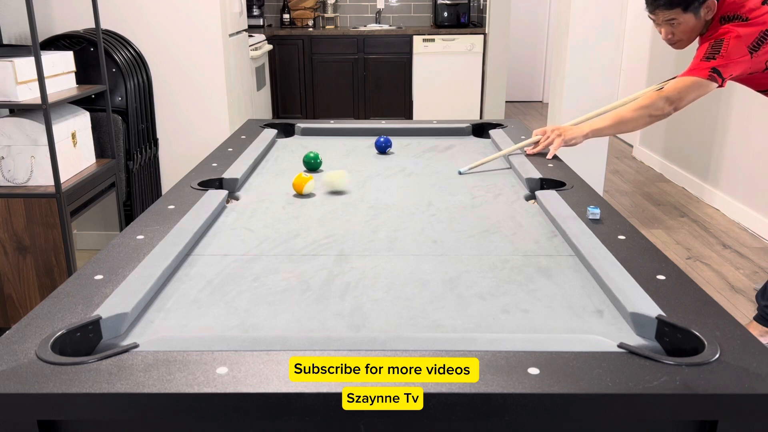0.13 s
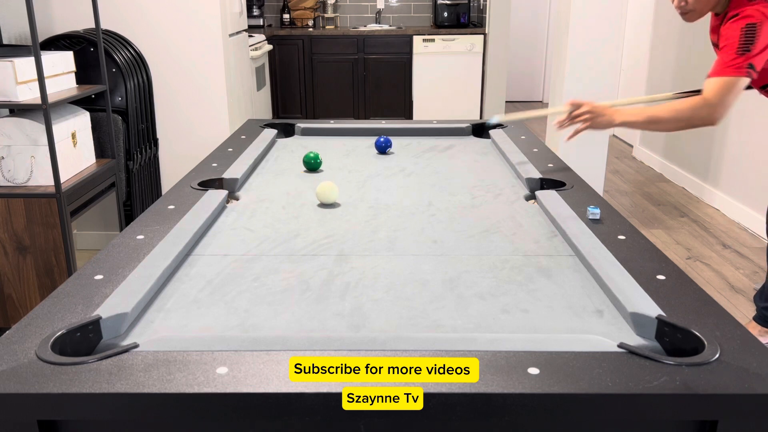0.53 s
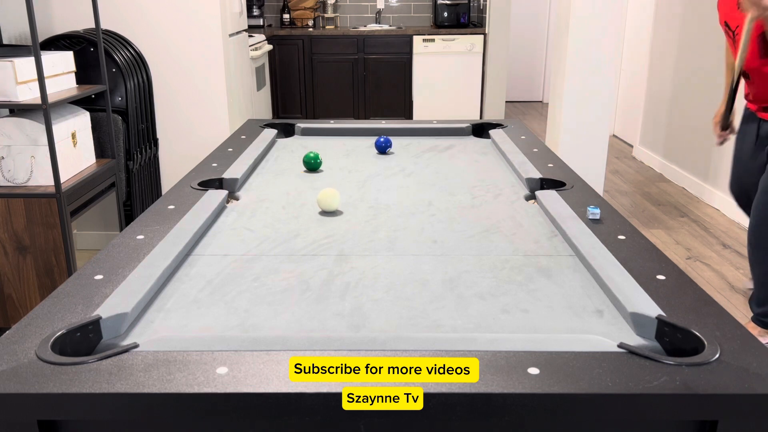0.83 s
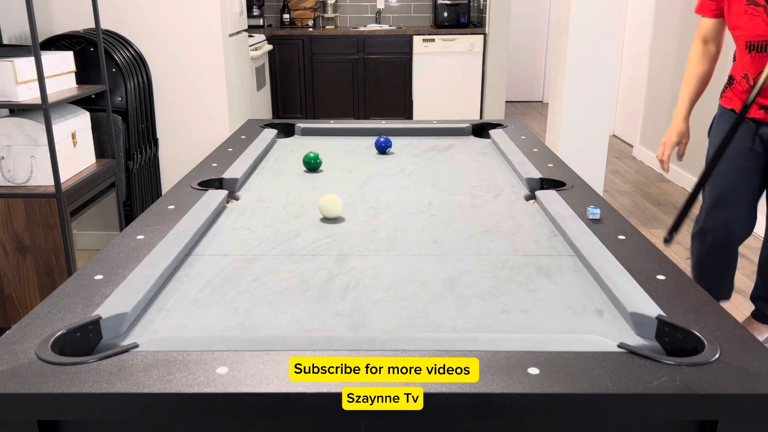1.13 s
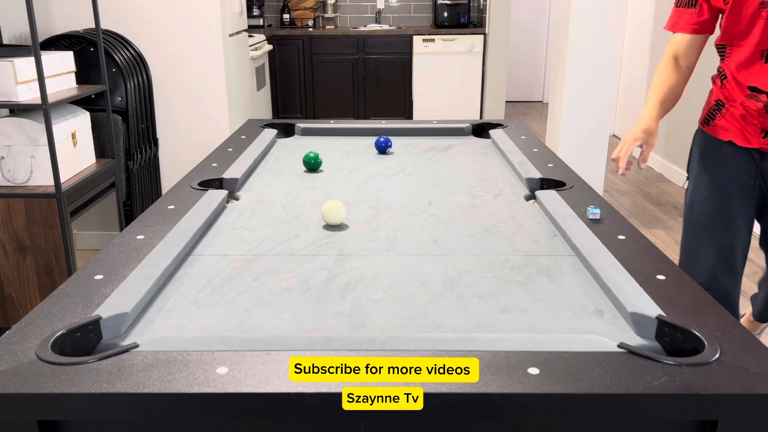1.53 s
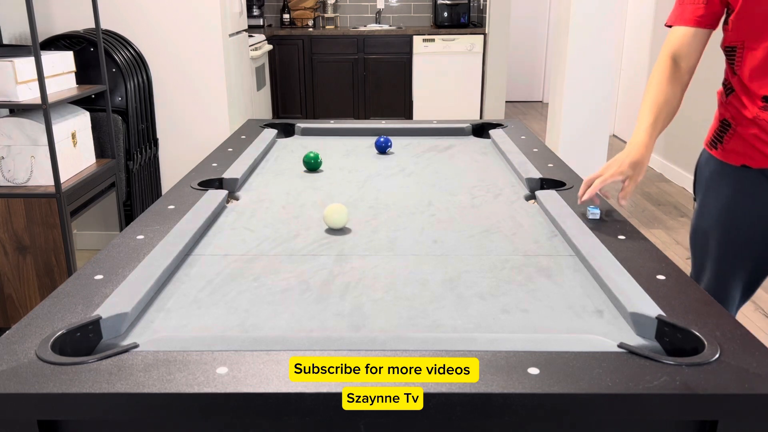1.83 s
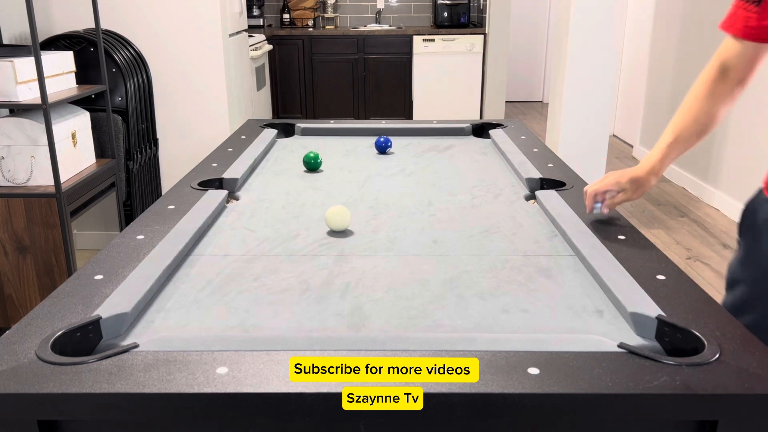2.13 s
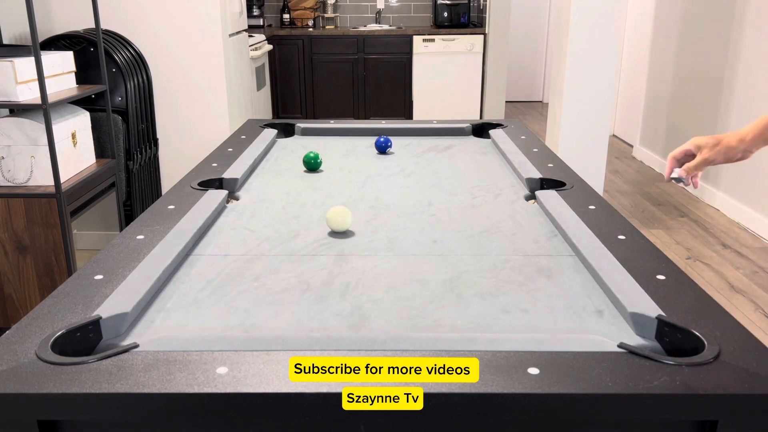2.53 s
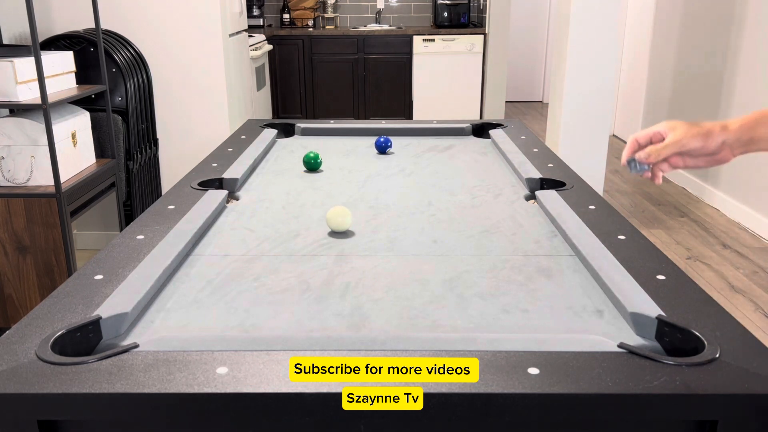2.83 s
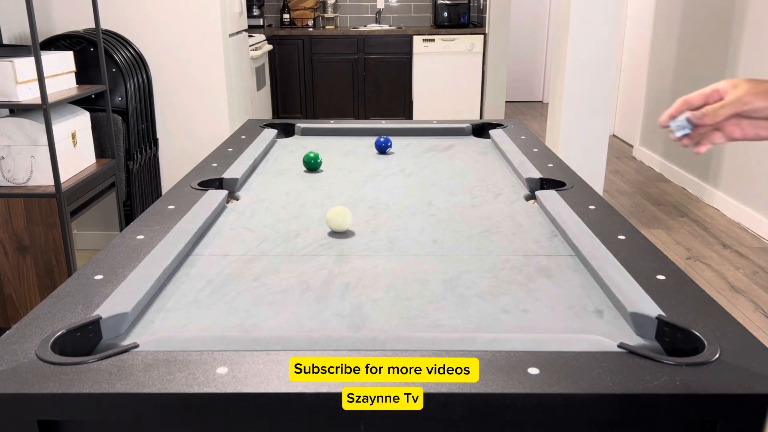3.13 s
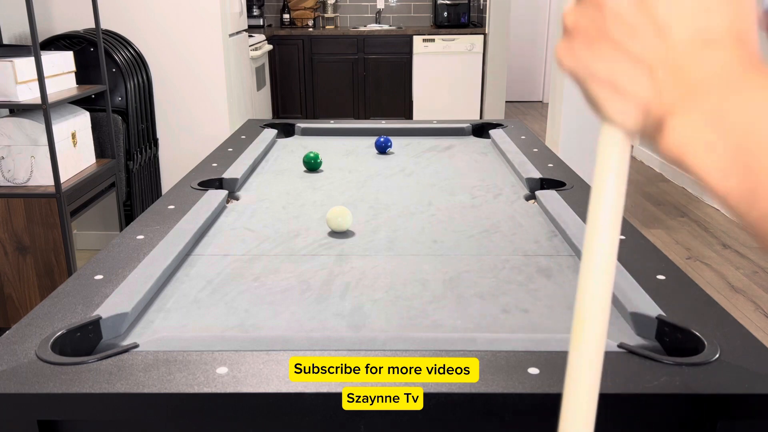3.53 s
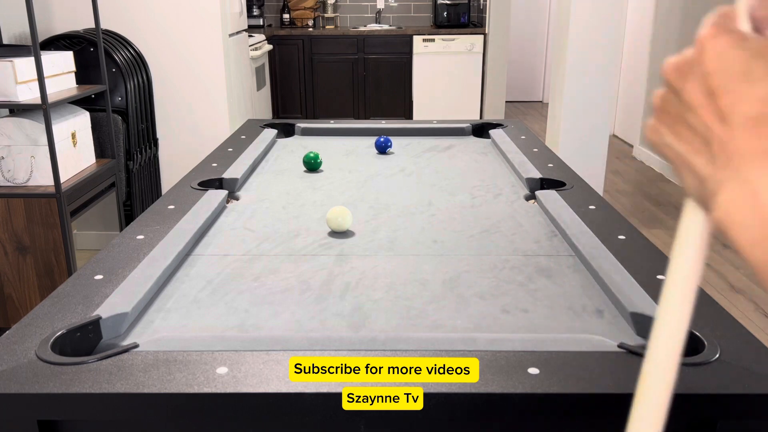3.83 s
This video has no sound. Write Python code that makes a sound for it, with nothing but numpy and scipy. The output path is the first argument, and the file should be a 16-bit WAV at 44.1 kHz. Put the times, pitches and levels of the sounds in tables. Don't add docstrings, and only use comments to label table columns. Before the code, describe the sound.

In a hard-floored, reverberant home room, a pool ball is struck, clicks another and drops into a pocket with a rattling thud; soft cloth movement, chalk ticks and a low cue-butt thump near the phone microphone follow.

```python
import sys
import numpy as np
from scipy import signal
from scipy.fft import rfft, irfft
from scipy.io import wavfile
from scipy.ndimage import uniform_filter1d

SR = 44100
rng = np.random.default_rng(int(sys.argv[2]) if len(sys.argv) > 2 else 0)


def linear_from_db(decibels):
    return 10 ** (np.asarray(decibels, float) / 20)


def transcribe(signal):
    frames = np.atleast_2d(signal).T
    limited = np.clip(frames, -1, 1)
    pcm = np.round(limited * 32767).astype(np.int16)
    wavfile.write(sys.argv[1], SR, pcm)


N = 176400
T = np.arange(N) / SR

# pitch_hz, level_db (per Hz)
RUMBLE = [(12, -39.5), (20, -10.5), (65, -4.5), (124, -13.5), (171, -14), (193, -17), (800, -30.5),
          (1040, -66), (1760, -120)]
RUMBLE_DB, SWELL_DB = -59.5, .4
# pitch_hz, level_db (per Hz)
AIR = [(700, -7), (900, -2), (1600, 2.5), (2600, -1), (3300, -16.5), (8000, -21.5), (12500, -9.5),
       (16000, -20.5)]
AIR_DB = -73
# pitch_hz, width_hz, level_db (rms)
FRIDGE = [(70.6, 19, -68.5), (166, 8, -74.5), (294.5, 7, -74.5)]

# time_s, level_db
ROLL = [
    (0, -43.5),
    (.2, -47.5),
    (.4, -56.5),
    (.65, -47.5),
    (1.1, -66),
]
# pitch_hz, width_hz, level_db
SLATE = [(74.5, 8.7, 4), (151, 25, -5), (300, 26, -3.5)]
ROLL_HISS_DB, ROLL_HISS_HZ = -16.5, 5000

# time_s, effort_db, crispness_db
MOVE = [(1.419, -84.5, 2), (1.469, -74, -7.5), (1.6, -71.5, -7.5), (1.75, -100, -11.5), (1.93, -100, 1),
        (2.0, -74.5, -2.5), (2.12, -71, -4.5), (2.27, -80, -1.5), (2.46, -100, -2), (2.549, -71, -4.5),
        (2.62, -64, -6.5), (2.68, -71.5, 1), (2.76, -66.5, 3), (2.9, -77.5, 0), (3.19, -88.5, 11),
        (3.219, -71.5, 0.5), (3.31, -81.5, 0), (3.42, -70, -1.5), (3.57, -68, -7), (3.66, -77.5, -4),
        (3.8, -82, -4.5), (3.881, -75, -3)]
# pitch_hz, level_db (per Hz)
FABRIC = [(400, -13.5), (900, -6), (1400, -4), (3000, -2.5), (6000, -6.5), (9000, -12), (12500, -6),
          (16000, -12)]
FABRIC_DB, FABRIC_GRAIN_DB = 6, 1
BACKGROUND_PAN_DB = 2.5

# start_s,
# level_db (rms), centre_hz, t60_s, pan_db (left over right)
SCUFFS = [(.001, -44.5, 12480, 0.2, 0.5), (.1832, -37, 13700, 0.014, 0), (.1885, -49, 12750, 0.19, 0.5),
          (.326, -39, 596, 0.67, 1.5), (.42, -29.5, 300, 0.72, -3), (.42, -56.5, 4570, 0.93, 10),
          (.8, -57.5, 500, 1.9, 2), (1.878, -66, 867, .25, 3), (1.488, -63, 1618, .5, 3),
          (1.965, -63, 800, .5, 3), (1.988, -57, 1098, .6, 2), (2.035, -60.5, 1350, .6, 1),
          (.19, -38, 150, .3, 1), (3.73, -52.5, 130.5, .5, 1), (3.208, -61, 1010, 0.15, -5),
          (3.328, -53, 1220, 0.075, -2), (3.33, -58.5, 400, 0.34, 6), (0.1879, -53.5, 6904, 0.17, 7),
          (0.325, -52.5, 12950, .4, 1), (.327, -54.5, 6190, 0.58, 8), (.466, -58, 13020, 0.34, 1.5),
          (.466, -59, 6600, 0.31, 3.5), (0.569, -61, 13070, 0.39, -0.5), (.568, -59.5, 6500, 0.15, 12),
          (0.678, -60.5, 8950, .1, 6.5), (.682, -49, 12980, 0.22, 0), (.682, -54.5, 6480, 0.76, 8),
          (0.682, -39, 3335, 0.055, 7), (.72, -59.5, 12440, 1, 0.5), (1.336, -77, 3360, 0.16, 10.5),
          (1.442, -70.5, 6980, 0.1, 2.5), (3.2, -62, 6930, 0.043, 2), (3.199, -59.5, 13000, .05, 0.5),
          (3.221, -66, 6930, 0.058, 2), (3.221, -62, 13150, 0.054, -11), (3.716, -62.5, 12970, 0.13, 1),
          (3.862, -64, 3040, 0.2, 4), (3.866, -62.5, 7460, 0.11, 3), (3.866, -64, 13030, 0.093, 1.5),
          (3.967, -59.5, 8280, 0.11, -2), (3.97, -64.5, 12950, .3, 0.5)]
SCUFF_WIDTH, SCUFF_RISE_S, SCUFF_TOP_HZ = 0.39, .001, 14500
SCUFF_ALIKE = 0.35

# time_s, level_db, pitch_hz, length_cycles, pan_db (left over right)
TICKS = [(1.445, -71, 5000, 0.33, 11), (1.89, -50.5, 300, 0.97, 3.5), (2.006, -49.5, 754, 1.5, 2),
         (2.018, -54.5, 1100, 1.6, -5), (2.046, -53, 780, 1.2, 1), (3.2088, -46, 1400, 0.35, 6),
         (3.2105, -48, 696, 0.65, -0.5), (3.329, -51, 1980, 0.38, 5), (3.3315, -53, 900, 0.53, 2),
         (3.3355, -62, 1290, 1.2, -4), (3.34, -45, 354, 0.32, -2)]
NEAR = [(3.058, -59, 8970, 0.38, 0.5), (3.2, -56, 5950, .25, 1), (3.222, -58, 7000, 0.68, 3),
        (3.713, -46, 2025, 0.74, 1.5), (3.715, -50, 13460, 2.1, 2), (3.752, -36, 75, 0.86, 1),
        (3.735, -46.5, 149.2, .8, 0.9), (3.79, -45, 120, 1, 0.3), (3.84, -59, 12500, 1, 3),
        (3.556, -60, 13000, 1.5, 1), (3.864, -56, 5000, .3, 5.5), (3.871, -50, 2420, 1.2, 4),
        (3.968, -53, 8000, 1.6, 1), (3.703, -56, 2500, .7, 2)]
BLOW = [
    (.004, -2, 321.4, 0.26, 2),
    (.004, -6, 696.7, 0.4, 3.5),
    (.004, -10.5, 450, .6, 1.5),
    (.004, -11, 2000, 0.44, 4.5),
    (.004, -15.5, 5000, 0.54, 3.5),
    (.004, -21, 13120, 1.5, 0.5),
]
INSIDE = [
    (.6886, -14.5, 2760, 0.53, 4.5),
    (.692, -16.5, 1600, 0.58, 2),
]
INSIDE_ECHOES = [
    (.6872, -26, 1850, .6, 2.5),
    (.6908, -16.5, 2700, .6, 4),
    (.6922, -18, 2600, .7, 3),
    (.6968, -20, 2400, 0.65, 3.5),
    (.7118, -22, 2300, 1, 3),
    (.7324, -20, 2550, 1, 2.5),
]
KNOCK = [(.33, -25, 300, 0.35, 2), (.4158, -19.5, 2100, 0.97, 2), (.4173, -3.06, 885, 1.02, 2),
         (.4205, -10, 682, 1.63, 5), (.426, -7.5, 1050, 0.52, 2.5), (.435, -13, 425, 0.62, 2.5),
         (.446, -11, 770, 0.9, 4), (.468, -9.5, 620, 0.99, -4), (.425, -19.5, 274, 0.95, 4),
         (.43, -24.5, 136, 0.71, 0.5), (.48, -25.5, 155, 0.63, 1.5)]
CLICK = [
    (.1847, -3, 2480, 0.58, 2),
    (.1858, -21, 4600, 1.3, 3),
    (0.14, -49, 7505, 0.53, 0),
]
# delay_s, left_db, right_db
ECHOES = [
    (.0044, -5, -9),
    (.0053, -10, -6),
    (.0076, -7, -14),
    (.0128, -9, -16),
]

# pitch_hz, level_db, t60_s
CUE = [(67.8, -27, 1.7), (144.64, -9.5, .33), (160.2, -2, 0.36), (300, -10.5, 0.4), (344, -11, 0.25),
       (475, -12.5, 0.33), (563, -15.5, 0.34), (608.5, -15.5, .3), (775.5, -14, .25), (1492, -19, 0.31),
       (2040, -28.5, 0.35), (3041, -26.5, .25)]
STROKE_S, STROKE_DB = -0.014, -5.5
LEAD_S = .03
RING_IN_ROOM = .3

# pitch_hz, t60_s
ROOM = [(63, 1), (125, 0.84), (250, .7), (500, 0.6), (1000, 0.8), (2000, 0.97), (4000, 0.73), (8000, 0.84),
        (14000, 0.3)]
WET_DB = dict(stroke=1.5, click=6, knock=3, inside=10.5, ticks=6.5, near=-1)
TAIL_RISE_S, FADE_DB_PER_S2 = 0.0087, 37
SPARSE_DB, SPARSE_S = 3.5, 0.026
WIDE_HZ = 400

LIMIT = 1.6
NOTCH_HZ, NOTCH_WIDTH_HZ, NOTCH_DB = 10110, 940, -44


def unit(x):
    return x / np.sqrt(np.mean(x ** 2))


def sides(db):
    return linear_from_db(np.array([[db / 2], [-db / 2]]))


def noise(gain, size=N):
    hz = np.arange(size // 2 + 1) * SR / size + 1
    mid, side = rfft(rng.standard_normal((2, size)))
    side = side * hz / np.hypot(hz, WIDE_HZ)
    side = side * hz / np.hypot(hz, WIDE_HZ / 2)
    return irfft(gain(hz) * np.array([mid + side, mid - side]), size)


def colour(points):
    hz, db = np.array(points).T
    return lambda f: linear_from_db(np.interp(np.log(f), np.log(hz), db))


def peaks(rows):
    return lambda f: sum(linear_from_db(db) / np.sqrt(width) / (1 + ((f - hz) / width * 2) ** 2) for hz, width, db in rows)


def walk(rate_hz):
    hold = int(SR / rate_hz)
    steps = np.repeat(rng.standard_normal(N // hold + 1), hold)
    smooth = uniform_filter1d(uniform_filter1d(steps, hold), hold)
    return unit(smooth[:N])


def room(x, wet_db):
    t = T[:SR]
    log_hz = np.log([hz for hz, _ in ROOM])
    tail = 0
    for k, (_, t60) in enumerate(ROOM):
        share = lambda f: np.sqrt(np.interp(np.log(f), log_hz, np.arange(len(ROOM)) == k))
        tail = tail + noise(share, size=SR) * linear_from_db(-60 * t / t60 - FADE_DB_PER_S2 * t ** 2)
    spikes = linear_from_db(SPARSE_DB * np.exp(-t / SPARSE_S) * (rng.exponential(size=SR) + 0.5))
    tail = tail * spikes * (1 - np.exp(-t / TAIL_RISE_S))
    tail = tail / np.sqrt(np.sum(tail ** 2) / 2)
    return x + linear_from_db(wet_db) * signal.fftconvolve(x, tail, axes=1)[:, :x.shape[1]]


def pulses(rows):
    out = np.zeros((2, N))
    for s, db, hz, cycles, pan_db in rows:
        reach_s = 4 * cycles / hz
        at = np.arange(int((s - reach_s) * SR), min(int((s + reach_s) * SR), N))
        turn = (at / SR - s) * hz
        wave = np.sin(2 * np.pi * turn + 0.54) * np.exp(-(turn / cycles) ** 2)
        out[:, at] -= linear_from_db(db) * sides(pan_db) * wave
    return out


def house():
    rumble = unit(noise(colour(RUMBLE))) * linear_from_db(RUMBLE_DB + SWELL_DB * walk(4.7))
    thin = lambda f: colour(AIR)(f) / (1 + (600 / f) ** 4)
    air = unit(noise(thin)) * linear_from_db(AIR_DB + 0.61 * walk(22))
    fridge = sum(linear_from_db(db) * unit(noise(peaks([(hz, width, 0)]))) for hz, width, db in FRIDGE)
    return rumble + air + fridge


def rolling():
    hiss = unit(noise(lambda f: f / ROLL_HISS_HZ / (1 + (f / ROLL_HISS_HZ) ** 2)))
    drumming = unit(noise(peaks(SLATE)))
    level_db = np.interp(T, *np.array(ROLL).T, right=-120)
    return (drumming + linear_from_db(ROLL_HISS_DB) * hiss) * linear_from_db(level_db)


def cloth():
    s, effort_db, crisp_db = np.array(MOVE).T
    effort = np.interp(T, s, effort_db, left=-110)
    crisp = np.interp(T, s, crisp_db)
    out = 0
    for hz, part_db in ((1300, -3.0), (4500, -3.5), (13000, crisp)):
        band = lambda f: colour(FABRIC)(f) * np.exp(-(np.log(f / hz) / 0.83) ** 2)
        out = out + unit(noise(band)) * linear_from_db(part_db + .5 * walk(10.0) + 1.2 * walk(20))
    return out * linear_from_db(effort + FABRIC_DB + FABRIC_GRAIN_DB * walk(310))


def scuffs():
    out, t = np.zeros((2, N + SR)), T[:SR]
    for s, db, hz, t60, pan_db in SCUFFS:
        band = lambda f: np.exp(-(np.log(f / hz) / SCUFF_WIDTH) ** 2) / (1 + (f / SCUFF_TOP_HZ) ** 20)
        rasp = noise(band, size=SR)
        rasp = unit(rasp + SCUFF_ALIKE * rasp.sum(axis=0))
        envelope = linear_from_db(db - 60 * t / t60) * (1 - np.exp(-t / SCUFF_RISE_S))
        at = max(int(s * SR), 0)
        out[:, at:at + SR] += rasp * envelope * sides(pan_db)
    return out[:, :N]


def distant_ticks():
    return room(pulses(TICKS), WET_DB["ticks"])


def near_contacts():
    return room(pulses(NEAR), WET_DB["near"])


def click_inside():
    return room(pulses(INSIDE), WET_DB["inside"]) + pulses(INSIDE_ECHOES)


def pocket_knock():
    return room(pulses(KNOCK), WET_DB["knock"])


def stroke():
    lead = int(LEAD_S * SR)
    t = np.arange(-lead, N - lead) / SR - STROKE_S
    phases = rng.random(len(CUE))
    ring = sum(linear_from_db(db - 60 * t / t60) * np.sin(2 * np.pi * (hz * t + phase))
               for (hz, db, t60), phase in zip(CUE, phases))
    ring = linear_from_db(STROKE_DB) * ring * (t > 0) * sides(0)
    blow = np.roll(pulses(BLOW), lead // 2, axis=1)
    heard = room(RING_IN_ROOM * ring + blow, WET_DB["stroke"]) + (1 - RING_IN_ROOM) * ring
    return np.pad(heard[:, lead:], ((0, 0), (0, lead)))


def click():
    straight = pulses(CLICK)
    echoes = sum(linear_from_db(np.array([[left_db], [right_db]])) * np.roll(straight, int(s * SR), axis=1)
                 for s, left_db, right_db in ECHOES)
    return room(straight, WET_DB["click"]) + echoes


def scene():
    background = (house() + rolling() + cloth()) * sides(BACKGROUND_PAN_DB)
    handling = scuffs() + distant_ticks() + near_contacts()
    balls = click_inside() + pocket_knock() + stroke() + click()
    return background + handling + balls


def top_cut(x):
    return signal.sosfilt(signal.butter(12, 15830, fs=SR, output="sos"), x)


def record(dry):
    rounded = LIMIT * np.tanh(dry / LIMIT)
    size = N + SR // 10
    hz = np.arange(size // 2 + 1) * SR / size
    dip = linear_from_db(NOTCH_DB * np.exp(-((hz - NOTCH_HZ) / NOTCH_WIDTH_HZ) ** 4))
    mix = irfft(rfft(rounded, size) * dip, size)[:, :N]
    return top_cut(mix)


dry = scene()
out = record(dry)
transcribe(out)
```